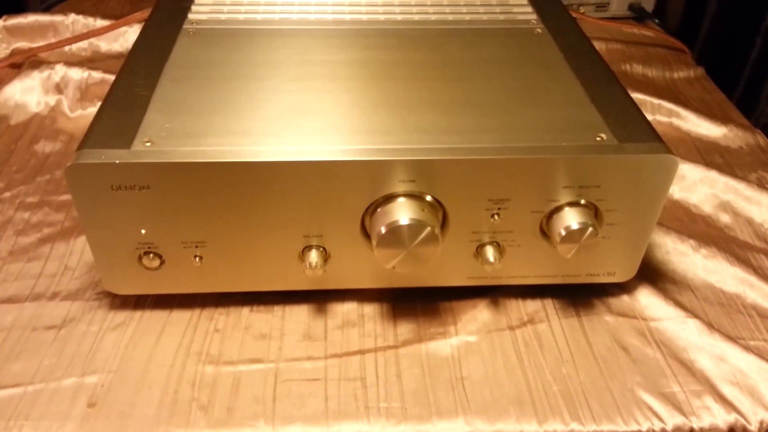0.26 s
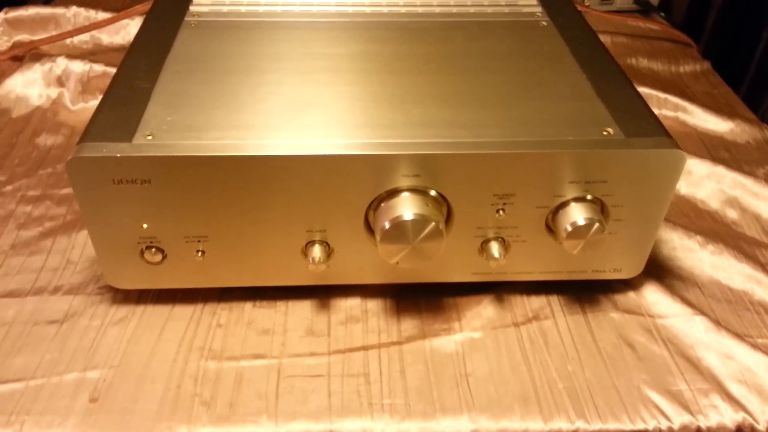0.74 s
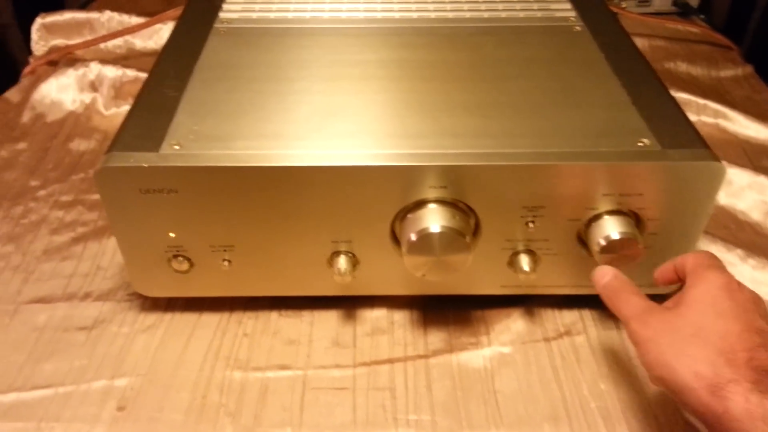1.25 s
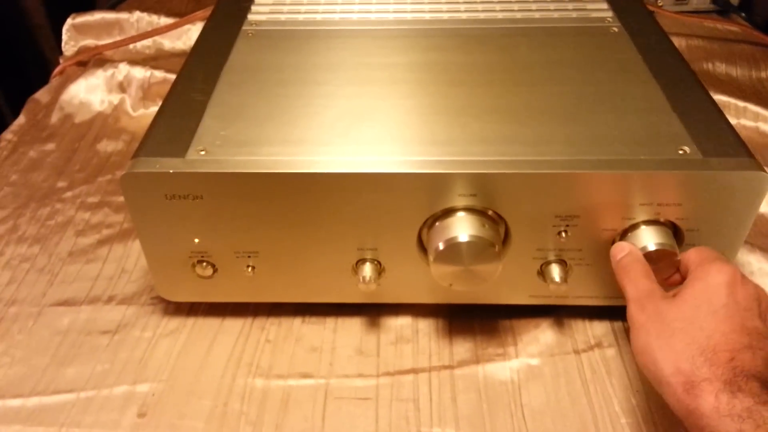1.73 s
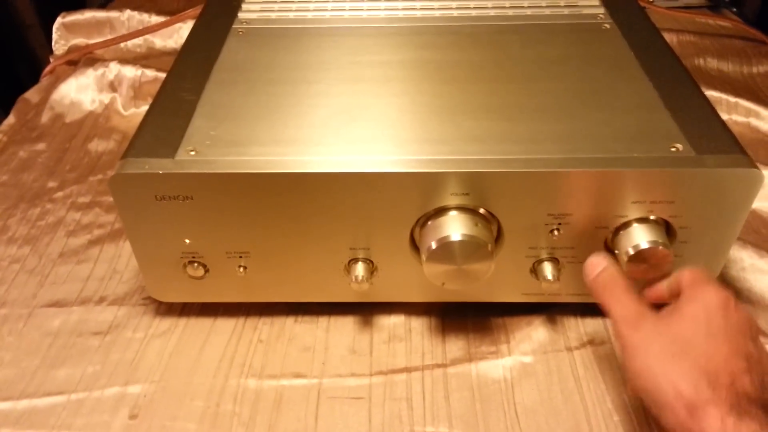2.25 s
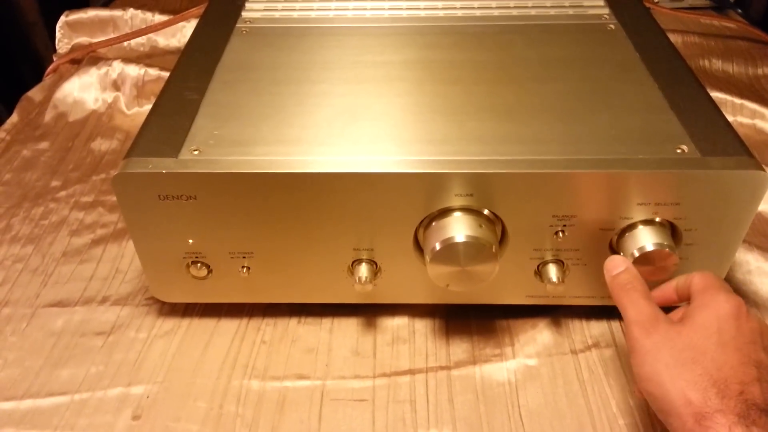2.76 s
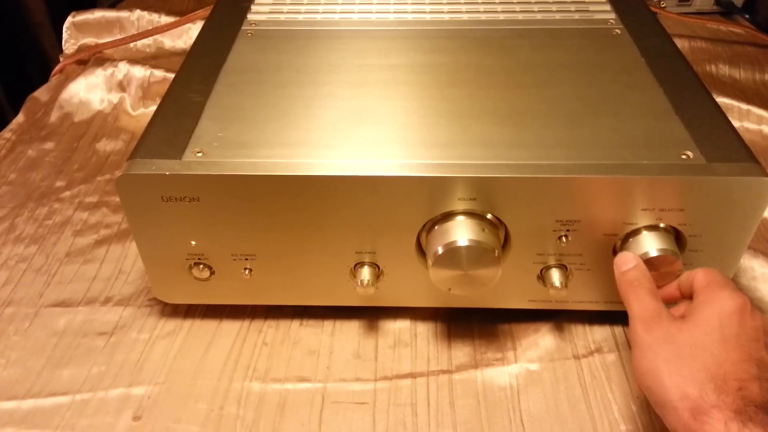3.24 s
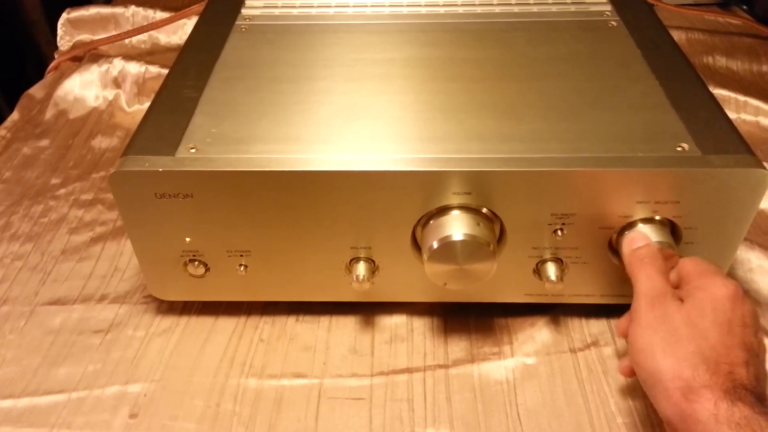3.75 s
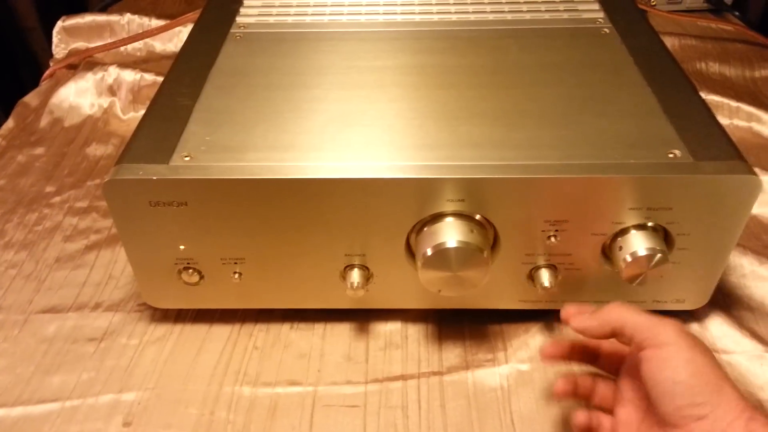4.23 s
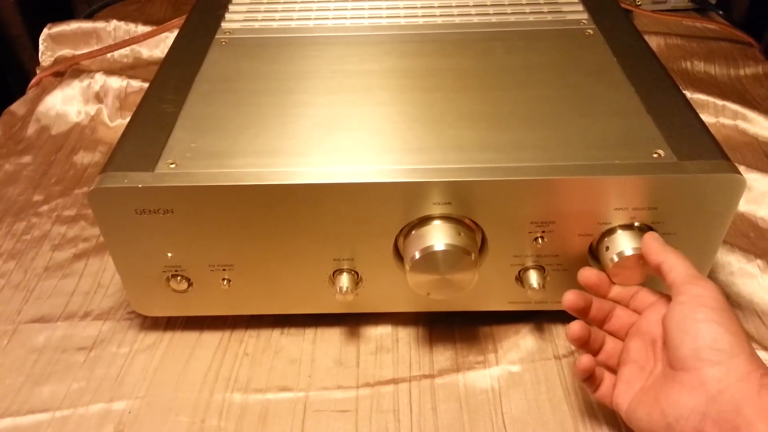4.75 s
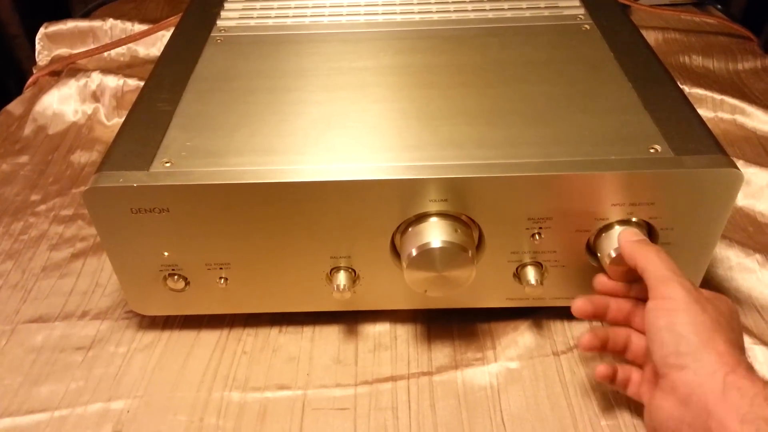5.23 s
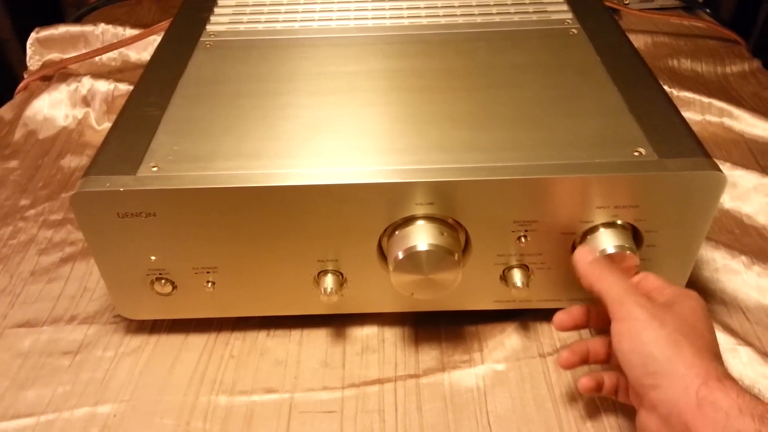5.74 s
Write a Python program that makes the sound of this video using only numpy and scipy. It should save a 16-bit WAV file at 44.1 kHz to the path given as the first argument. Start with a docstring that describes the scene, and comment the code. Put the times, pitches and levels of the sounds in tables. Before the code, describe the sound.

An amplifier's selector knob clunks three times, each step followed by small relay clicks, over a steady low electrical buzz and hiss.

```python
"""Turning an amplifier's input knob

A metal-cased amplifier's knob is turned three steps in a small room, close to a camera's microphones.
At each step a ball climbs a ramp, snaps into a notch and thumps the case. Relays (electric switches)
click a moment later. Early on, the cloth under the case swishes once. Beneath it all are room noise,
hiss, hum and an electrical putter, about 30 pulses a second, in the camera's left channel."""
import sys
import numpy as np
from scipy import signal
from scipy.fft import rfft, irfft, next_fast_len
from scipy.io import wavfile
from scipy.ndimage import map_coordinates

SR = 44100
rng = np.random.default_rng(int(sys.argv[2]) if len(sys.argv) > 2 else 0)


def wav_record(signal):
    """Record a signal, one row per channel, as 16-bit PCM in the file named by sys.argv[1]."""
    frames = np.transpose(np.atleast_2d(signal))
    bounded = np.clip(frames, -1, 1)
    # unit amplitude maps onto the largest positive 16-bit level
    quanta = np.round(bounded * 32767).astype(np.int16)
    wavfile.write(sys.argv[1], SR, quanta)


N = 264159
TIME = np.arange(N) / SR
RING = np.arange(SR // 2) / SR  # seconds after a hit

# Levels in the tables are relative. A t60 is the seconds a sound takes to fade by 60 dB.
# Steps of the knob: landing_s, climb_s, snap_db, boom_db, front_panel_db, ping_hz, ping_db
KNOB_STEPS = [(2.0990, 0.065, -7, -26, -23.5, 1980, -15.5), (3.8503, .1105, -3, -12.5, -40.5, 4540, -39),
              (5.2019, .0476, -4, -16.5, -29, 2670, -8)]
# Double clicks of the muting relay: start_s, gap_s, click_db, moving_arm_db
MUTE_CLICKS = [(.0962, 0.019, -23, -45), (2.6543, .0105, -23, -36.5), (4.4146, .0103, -23, -34),
               (5.7568, 0.0098, -23, -35.5)]
# Small pushes on the case: start_s, boom_db, front_panel_db
CASE_NUDGES = [(.321, -46.5, -32.5), (1.735, -36.5, -58), (3.529, -44, -49)]


def amp(db):
    """Turn decibels into a gain."""
    return 10 ** (np.asarray(db) / 20)


def unit(x):
    """Scale a sound to an average (rms) level of 1."""
    return x / np.sqrt(np.mean(x ** 2) + 1e-20)


def along(points, hz):
    """Read between (pitch_hz, value) points on a log pitch scale."""
    pitches, values = np.transpose(points)
    return np.interp(np.log(hz + 1), np.log(pitches + 1), values)


def wobble(rate):
    """A smooth curve through `rate` random values a second."""
    return map_coordinates(rng.standard_normal(int(N * rate / SR) + 4), [TIME * rate])


def filtered(x, response):
    """Give each frequency the gain response(hz)."""
    size = x.shape[-1]
    padded = next_fast_len(size + SR // 2)
    return irfft(rfft(x, padded) * response(np.fft.rfftfreq(padded, 1 / SR)), padded)[..., :size]


def coloured(x, db_of_hz, size=2048):
    """Shape the tone by a dB curve, with no sound leaking ahead of a hit."""
    gain = np.maximum(amp(db_of_hz(np.fft.rfftfreq(size, 1 / SR))), 1e-6)
    cepstrum = irfft(np.log(gain))
    cepstrum[..., 1:size // 2] *= 2
    cepstrum[..., size // 2 + 1:] = 0
    impulse = np.atleast_2d(irfft(np.exp(rfft(cepstrum))))
    return signal.fftconvolve(x, impulse, axes=1)[:, :x.shape[1]]


def fade(t60):
    """A fall of 60 dB in t60 seconds; 1 - fade makes a rise."""
    return np.exp(-np.log(1000) * RING / t60)


def add(track, start_s, sound):
    """Mix a stereo sound into the track."""
    part = track[:, round(start_s * SR):][:, :sound.shape[1]]
    part += sound[:, :part.shape[1]]


def noise(spectrum, top_hz=14700):
    """Steady stereo noise, partly alike on both sides in the bass and wide in the treble."""
    # How alike left and right are: pitch_hz, likeness (0 to 1)
    likeness = [(40, 0.37), (120, 0.46), (400, 0.44), (1000, 0.041), (3000, 0.017), (10000, 0.01)]
    angle = lambda hz: np.arccos(np.clip(along(likeness, hz), -1, 1)) / 2
    shares = lambda hz: [np.cos(angle(hz)), np.sin(angle(hz))]
    colour = lambda hz: amp(along(spectrum, hz)) * (hz < top_hz) * shares(hz)
    mid, side = filtered(rng.standard_normal((2, N)), colour)
    return unit(np.array([mid + side, mid - side]))


def background(air_db=-50.0, hiss_db=-57.5, waver_db=1):
    """Room noise and microphone hiss, with a slightly unsteady hum and a thin whine."""
    # Tone of the room noise and of the hiss: pitch_hz, level_db
    air_tone = [(25, -41), (55, -11), (95, -8.5), (150, -5), (200, 0), (300, -1.5), (430, -4.5), (560, -8),
                (720, -12), (1000, -14.5), (1300, -17.5), (2000, -33.5)]
    hiss_tone = [(700, -30), (1400, 1), (2800, 1), (4300, -4.5), (6000, -9.5), (9000, -8.5), (14600, -8)]
    # Notes of the hum and of the camera's whining electronics: pitch_hz, level_db
    hum_notes = [(60, -102), (119.8, -59), (178, -65), (274.5, -63.5), (410.5, -55.5), (862, -65.5)]
    whine_notes = [(3822, -83), (10218, -84), (13523, -85)]

    def note(hz, db, drift):
        level = amp(db + waver_db * wobble(3.827)) * np.sqrt(2)
        return level * np.sin(2 * np.pi * hz * TIME + drift * wobble(4.4))

    hum = sum(note(hz, db, drift=hz / 450) for hz, db in hum_notes)
    whine = sum(note(hz, db, drift=.8) for hz, db in whine_notes)
    return amp(air_db) * noise(air_tone) + amp(hiss_db) * noise(hiss_tone) + hum + whine


def putter(level_db=-27, rate_hz=30.048, width_s=0.001402, low_hz=200, high_hz=1800, right_gain=-0.075):
    """Once a camera frame, a square pulse of current leaks into the left input, bent by its bass cut."""
    since_pulse = (TIME - 1.0353) % (1 / rate_hz)
    pulses = (since_pulse < width_s) * amp(level_db + .9 * wobble(20))

    def input_filter(hz):
        gentle_bass_cut = 1j * hz / (low_hz + 1j * hz)
        steep_bass_cut = -hz ** 2 / (low_hz ** 2 - hz ** 2 + np.sqrt(2) * 1j * hz * low_hz)
        treble_cut = 1 / (1 + 1j * hz / high_hz) ** 2
        return gentle_bass_cut * steep_bass_cut * treble_cut

    return np.outer([1, right_gain], filtered(pulses, input_filter))


def cloth_swish(level_db=-45, rise_s=0.049, fall_db_per_s=106, start_hz=2445, glide_hz_per_s=6000):
    """The cloth under the case slides at the first nudge: it swells, brightens and dies away."""
    track = np.zeros((2, N))
    fall = amp(level_db - fall_db_per_s * np.maximum(RING - rise_s, 0))
    envelope = np.minimum(RING / rise_s, 1) * fall
    centre_hz = start_hz + glide_hz_per_s * RING
    low_noise = filtered(rng.standard_normal((2, len(RING))), lambda hz: 1 / (1 + (hz / 850) ** 2))
    swish = unit(low_noise * np.cos(2 * np.pi * np.cumsum(centre_hz) / SR))
    add(track, CASE_NUDGES[0][0], envelope * swish)
    return track


def room_echo():
    """The room's soft echo: each frequency dies away at its own speed."""
    # How long the room rings: pitch_hz, t60_s
    echo_times = [(200, 0.71), (1000, 0.47), (3000, 0.3), (6000, 0.37), (14000, 0.31)]
    hz, t, bands = signal.stft(rng.standard_normal((2, len(RING))), SR, nperseg=256)
    decay = np.exp(-np.log(1000) * t / along(echo_times, hz)[:, None])
    tail = signal.istft(bands * decay, SR, nperseg=256)[1][:, :len(RING)]
    return unit(tail * (1 - fade(0.039)))


def ringing(notes, t60, spread, scatter=0, damping=0.26):
    """A struck part rings at its own notes: the lowest lasts t60, higher ones die sooner."""
    sound = np.zeros((2, len(RING)))
    for k, (hz, db) in enumerate(notes):
        # Neighbours tend to start in opposite directions, so close pairs swell and then beat.
        phase = np.pi * k + scatter * rng.standard_normal()  # varies from hit to hit
        phase = phase + spread * rng.standard_normal((2, 1))  # and between the microphones
        decay = fade(t60 * (notes[0][0] / hz) ** damping)
        sound += amp(db + rng.normal(0, 1)) * np.sin(2 * np.pi * hz * RING + phase) * decay
    return unit(sound)


def contacts(hits, tone, notes, level_db, crack_db, crack_t60, rattle_t60, swell_s, rattle_treble_db,
             ring_db, ring_t60, room_db):
    """Parts hit each other: a sharp crack, a rattle spreading through the case, ringing and echo."""
    # How much louder the right side is than the left: pitch_hz, level_db
    right_lead = [(250, 15), (500, -9), (1000, 0.5), (2000, 8.5), (4000, 8.5), (8000, 2.5), (13000, 2)]
    track = np.zeros((2, N))
    treble = lambda hz: 1 / (1 + (3900 / (hz + 1)) ** 8)  # 0 in the bass, 1 in the treble
    for start_s, db, treble_db in hits:
        # The crack reaches both microphones partly alike.
        grit = rng.standard_normal(len(RING)) + 1.35 * rng.standard_normal((2, len(RING)))
        crack = unit(grit * fade(crack_t60) * (1 - fade(0.0016)))
        rattle = unit(rng.standard_normal((2, len(RING))) * fade(rattle_t60) * (1 - fade(swell_s)))
        tail = coloured(rattle + amp(room_db) * room_echo(), lambda hz: rattle_treble_db * treble(hz))
        click = coloured(amp(crack_db) * crack + tail, lambda hz: along(tone, hz) + treble_db * treble(hz))
        ring = ringing(notes, ring_t60, spread=0.55, scatter=np.pi) * (1 - fade(0.017))
        add(track, start_s, amp(db + level_db) * (unit(click) + amp(ring_db) * ring))
    return coloured(track, lambda hz: np.outer([-.5, .5], along(right_lead, hz)))


def case_boom(level_db=-19, base_db=-5, thud_db=-8, thud_t60=0.32, lag_s=.0015, swell_s=0.018):
    """Snaps, the muting relay and nudges shake the case: its metal sheets boom over a dull thud."""
    # Notes of the base plate, lid and front panel: pitch_hz, level_db
    base_notes = [(226, -10), (252, -15)]
    lid_notes = [(450, -35), (482, 2), (514, -3.5), (545, -49)]
    front_notes = [(275, 3), (360, 0.5), (391, 10.5), (425, -10.5), (520, 0)]
    # Tone of the thud: pitch_hz, level_db
    thud_tone = [(30, -22), (120, -10), (200, 0), (450, 9), (650, -0.5), (900, 4), (2000, -29)]
    sheets = [(base_notes, 0.21), (lid_notes, 0.22), (front_notes, 0.25)]  # notes, t60_s
    blows = [(s, boom_db, front_db) for s, _, _, boom_db, front_db, _, _ in KNOB_STEPS]
    blows += [(s + gap_s / 2, db - 19.5, db - 30) for s, gap_s, db, _ in MUTE_CLICKS]
    track = np.zeros((2, N))
    rise = 1 - fade(swell_s)
    for start_s, boom_db, front_db in blows + CASE_NUDGES:
        gains = amp([boom_db + base_db, boom_db, front_db])
        boom = sum(gain * unit(ringing(notes, t60, spread=0.37) * rise)
                   for gain, (notes, t60) in zip(gains, sheets))
        burst = rng.standard_normal((1, len(RING))) * fade(thud_t60) * rise
        thud = np.linalg.norm(gains) * unit(coloured(burst, lambda hz: along(thud_tone, hz)))
        add(track, start_s + lag_s, amp(level_db) * (boom + amp(thud_db) * thud))
    return track * amp([[1], [-1]])  # a little louder on the left


def relays(arm_lead_s=0.01):
    """Input relays and the knob tick lightly; the muting relay's arm moves, then clicks twice."""
    # Light ticks: start_s, level_db, treble_db
    tick_hits = [(.688, -50, -6), (.892, -52, -9), (1.734, -43.5, -9), (2.4045, -25.5, -11.5),
                 (2.463, -41, -1), (4.0265, -29.5, -10), (4.213, -34.5, -6.5), (5.4985, -26.5, -9),
                 (5.560, -39, -2)]
    # Tone and ringing notes of the muting relay, then of the ticks: pitch_hz, level_db
    mute_tone = [(290, -37), (500, -13), (696, -16.5), (1120, -10), (1560, -9.5), (1850, 0), (2100, -8),
                 (3280, -10), (3580, -10.5), (5280, -14.5), (5670, -24), (14200, -17.5), (15500, -36)]
    mute_notes = [(1114, -54), (1340, -57), (1880, -45), (2363, -55), (2735, -53), (3553, -55), (4447, -55)]
    tick_tone = [(530, -51), (900, 0.5), (1690, -5), (2720, 0), (3710, -3), (4550, 3.5), (7680, -9.5),
                 (13100, -8), (14600, -11), (15500, -67)]
    tick_notes = [(1873, -62), (2460, -51.5), (2789, -52), (3494, -56), (3881, -69), (4382, -56)]
    clicks = []  # start_s, level_db, treble_db
    for s, gap_s, db, arm_db in MUTE_CLICKS:
        clicks += [(s - arm_lead_s, arm_db, -7), (s, db, 2.5), (s + gap_s, db, -2.5)]
    mute = contacts(clicks, mute_tone, mute_notes, level_db=-25, crack_db=-5, crack_t60=0.012,
                    rattle_t60=0.062, swell_s=0.0095, rattle_treble_db=2.5,
                    ring_db=-5.5, ring_t60=0.14, room_db=-9.5)
    ticks = contacts(tick_hits, tick_tone, tick_notes, level_db=-26.5, crack_db=-1.5, crack_t60=0.0087,
                     rattle_t60=0.083, swell_s=0.01, rattle_treble_db=2,
                     ring_db=-2, ring_t60=0.065, room_db=-5.5)
    return mute + ticks


def ping(pitch_hz, t60=0.011, width=0.4, pan_db=3):
    """A small part, like the ball and its spring, rings briefly and roughly, more on the right."""
    band = lambda hz: 1 / (1 + ((hz / pitch_hz - 1) / width) ** 4)
    grit = filtered(rng.standard_normal((2, len(RING))), band)
    return unit(grit * fade(t60) * (1 - fade(0.0045))) * amp([[-pan_db], [pan_db]])


def knob(ping_gain_db=-25, crest_lead_s=.0047):
    """The knob's ball scrapes up its ramp, tips softly over the crest and lands hard in a notch."""
    # The ball catches three times on each climb: delay_s, level_db, treble_db
    catches = [(0, -15.5, 3), (.0055, -17.5, 0), (.013, -28, 9.5)]
    # The ball settling after the first step, then an input relay's ringing tick: start_s, ping_hz, ping_db
    brief_pings = [(2.204, 1730, -32), (4.213, 4200, -40)]
    # Tone and ringing notes of the climb, then of the snap on the panel: pitch_hz, level_db
    ramp_tone = [(120, -42), (200, -11.5), (618, -9), (842, 1.5), (974, -12), (1110, 5.5), (1540, -10.5),
                 (2290, 1), (3300, -7.5), (4180, -8.5), (5700, -26), (9660, -26), (12700, -30),
                 (14200, -24), (15500, -44)]
    ramp_notes = [(436, -37.5), (592, -39.5), (1114, -36), (1290, -43), (1820, -41), (2353, -46),
                  (2767, -42), (3095, -44), (4274, -34)]
    notch_tone = [(350, -52), (600, 0.5), (746, -9), (915, 4.5), (1060, -10.5), (1560, 2), (2220, -3),
                  (2570, -5), (3160, -1.5), (5150, -9), (6230, -26), (10700, -19), (14500, -29),
                  (15500, -34)]
    panel_notes = [(813, -41.5), (915, -38), (985, -40.5), (1077, -37), (1168, -39), (1346, -37),
                   (1523, -41), (1610, -54), (1787, -51), (1965, -40), (2215, -35.5), (2358, -49),
                   (2562, -47), (2751, -42), (2950, -36), (3100, -50), (3203, -53), (3311, -45),
                   (3420, -46.5)]
    climbs, snaps = [], []  # start_s, level_db, treble_db
    pings = np.zeros((2, N))
    for s, climb_s, snap_db, _, _, ping_hz, ping_db in KNOB_STEPS:
        climbs += [(s - climb_s + delay_s, db, treble_db) for delay_s, db, treble_db in catches]
        snaps += [(s - crest_lead_s, snap_db - 5, 4), (s, snap_db, 5.5)]
        add(pings, s, amp(ping_gain_db + ping_db) * ping(ping_hz))
    for s, ping_hz, ping_db in brief_pings:
        add(pings, s, amp(ping_gain_db + ping_db) * ping(ping_hz))
    climb = contacts(climbs, ramp_tone, ramp_notes, level_db=-26, crack_db=-22.5, crack_t60=0.045,
                     rattle_t60=0.048, swell_s=0.048, rattle_treble_db=6,
                     ring_db=-4.5, ring_t60=0.25, room_db=-8.0)
    snap = contacts(snaps, notch_tone, panel_notes, level_db=-30.0, crack_db=-3, crack_t60=0.018,
                    rattle_t60=0.057, swell_s=0.024, rattle_treble_db=-11.5,
                    ring_db=-8.5, ring_t60=0.29, room_db=-7.5)
    return climb + snap + pings


def scene():
    """Everything at the two microphones."""
    return knob() + relays() + case_boom() + cloth_swish() + background() + putter()


def record(dry):
    """The camera flattens the tallest peaks and cuts the highest treble steeply."""
    top_hz = 15600
    return filtered(np.clip(dry, -.9, .9), lambda hz: 1 / np.sqrt(1 + (hz / top_hz) ** 120))


dry = scene()
out = record(dry)
wav_record(out)
```